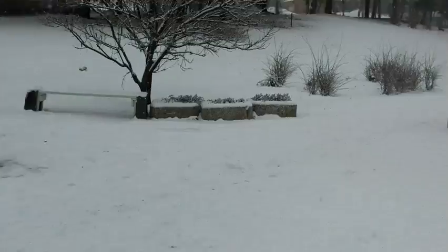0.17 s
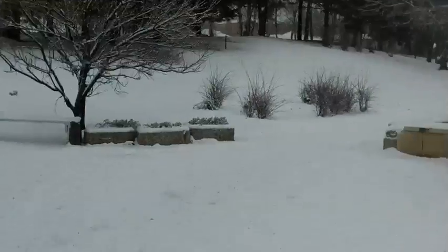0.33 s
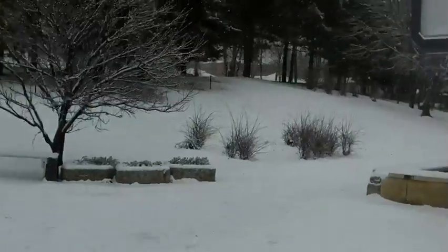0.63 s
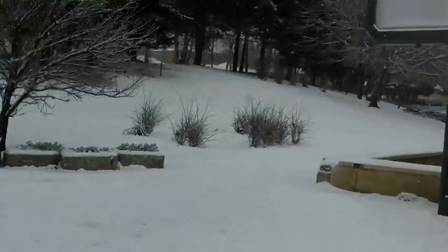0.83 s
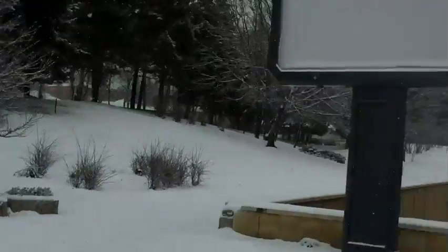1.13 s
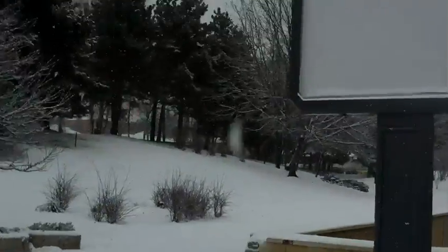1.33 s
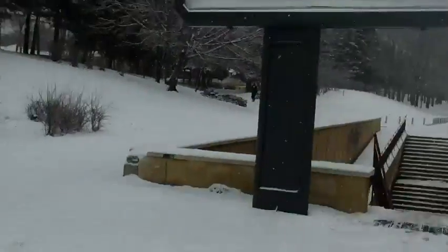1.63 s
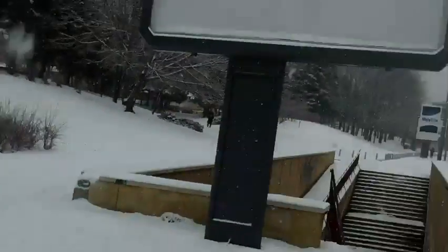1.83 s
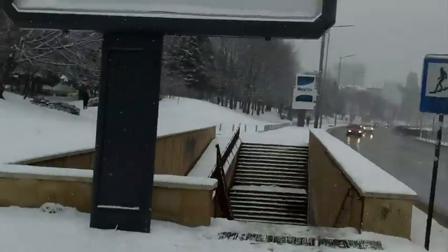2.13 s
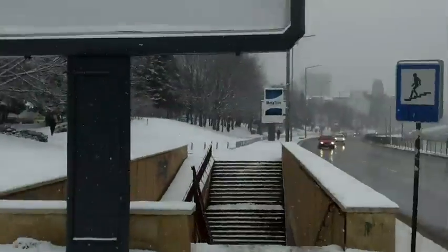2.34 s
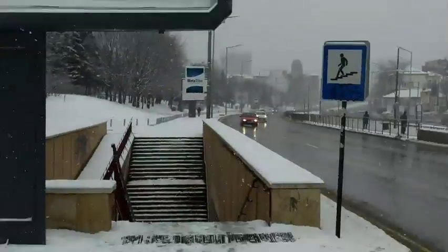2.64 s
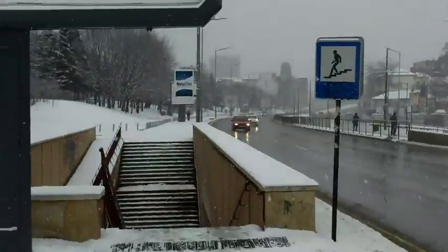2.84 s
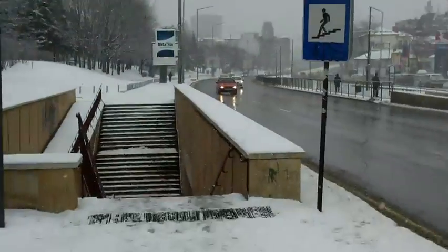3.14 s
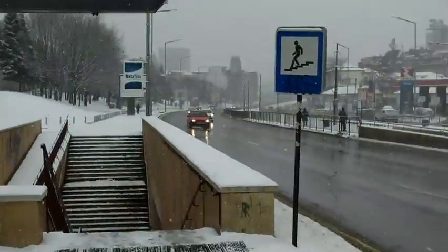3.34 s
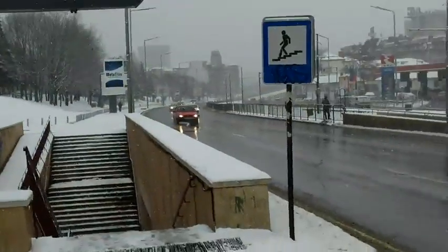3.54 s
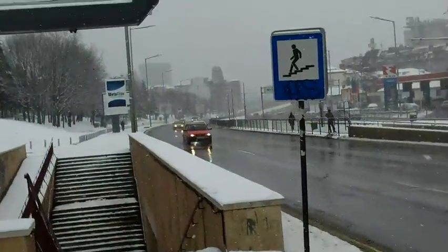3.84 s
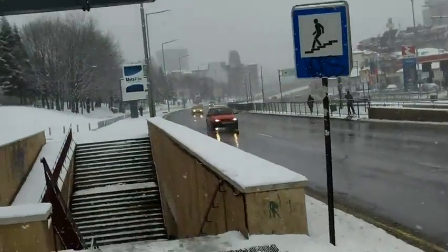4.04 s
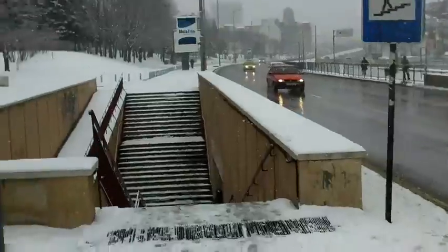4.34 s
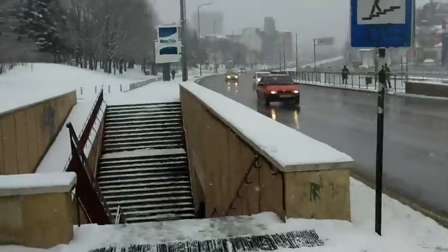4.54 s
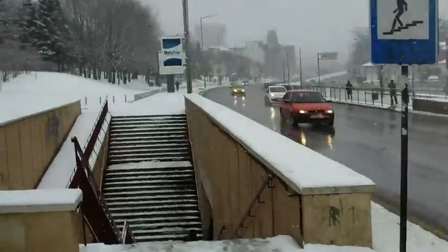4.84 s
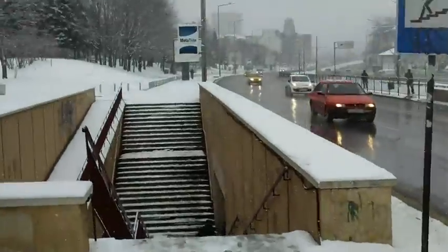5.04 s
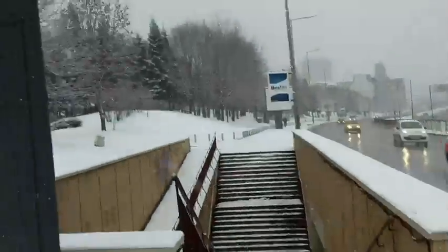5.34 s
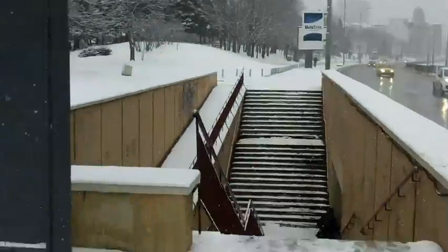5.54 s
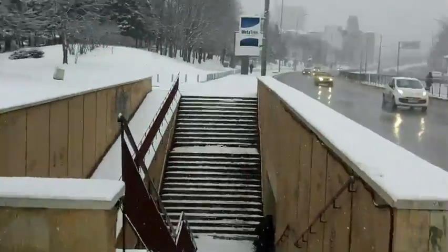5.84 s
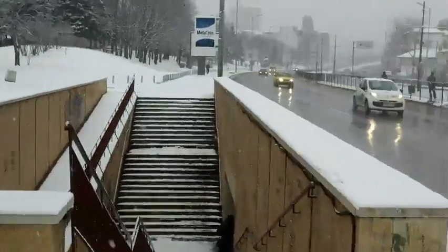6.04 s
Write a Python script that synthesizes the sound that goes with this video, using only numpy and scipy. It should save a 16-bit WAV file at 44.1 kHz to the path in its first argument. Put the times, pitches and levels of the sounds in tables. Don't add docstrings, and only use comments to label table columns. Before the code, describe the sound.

Cars hiss past on a wet, slushy road, tyre spray swelling twice over a low drone of engines and distant traffic.

```python
import sys
import numpy as np
from scipy import signal
from scipy.fft import rfft, irfft
from scipy.io import wavfile
from scipy.ndimage import uniform_filter1d

SR = 44100
rng = np.random.default_rng(int(sys.argv[2]) if len(sys.argv) > 2 else 0)


def inscribe(sig):
    pcm = np.round(np.clip(np.atleast_2d(sig).T, -1, 1) * 32767)
    wavfile.write(sys.argv[1], SR, pcm.astype(np.int16))


def elevation(decibels):
    levels = np.asarray(decibels, float)
    return 10 ** (levels / 20)


N = 272777
HZ = np.fft.rfftfreq(512, 1 / SR)[:, None]
TIME = np.arange(N // 128 + 5) * 128 / SR


def evened(x):
    return x / np.sqrt(np.mean(x ** 2) + 1e-20)


def hump(x, centre, spread):
    return np.exp(-.5 * ((x - centre) / spread) ** 2)


def read(points, hz):
    f, value = np.transpose(points)
    return np.interp(np.log(hz + 1), np.log(f + 1), value)


def power_db(power):
    return 10 * np.log10(power)


def blotches(bins, frames):
    field = rng.standard_normal((len(TIME), len(HZ))).T
    for _ in range(2):
        field = uniform_filter1d(field, bins, axis=0)
        field = uniform_filter1d(field, frames, axis=1, mode="wrap")
    return evened(field)


def noise(power):
    a, b = rng.standard_normal((len(TIME), len(HZ), 2)).T
    spectra = a + 1j * b
    flat = signal.istft(spectra, nperseg=512, noverlap=384)[1]
    unit = flat.std() / np.sqrt(len(HZ))
    return signal.istft(spectra * np.sqrt(power) / unit, nperseg=512, noverlap=384)[1][:N]


# [f/Hz, level/dB per bin]
SELF_HISS = [(6000, -108), (9000, -100), (12000, -99), (15000, -99)]


def self_hiss():
    return elevation(read(SELF_HISS, HZ)) ** 2


# [t/s, low f/Hz, high f/Hz]
PARTINGS = [
    (1.23, 6800, 8400),
    (3.46, 4100, 6400),
    (4.06, 4600, 6400),
    (4.62, 4100, 6400),
    (4.83, 4100, 5300),
    (5.5, 13000, 14500),
    (5.97, 7500, 9000),
    (6.15, 4600, 5700),
    (6.15, 8800, 10400),
]


def parting(road, both):
    faint = (power_db(both) + 2.6 * blotches(3, 6) < -90.5) * (HZ > 7000) * (HZ < 15100)
    faint = faint * (blotches(2, 12) < .3)
    side_db = -2.5
    side = elevation(side_db) ** 2 * np.minimum(both, elevation(-77) ** 2) * faint
    for at, lo, hi in PARTINGS:
        side = side + elevation(-2.0) ** 2 * road * (abs(TIME - at) < .007) * (HZ > lo) * (HZ < hi)
    return side


def thinned(both):
    weak = (power_db(both) < -90) * (HZ > 12600)
    holes = weak * (blotches(1, 14) > .2)
    holes = np.maximum(holes, (HZ > 15100) * (blotches(1, 12)[0] > -.2))
    return both * (1 - holes) * elevation(1.5 * weak) ** 2


# [t/s, nearness level/dB, lane wetness level/dB, heading +1 coming to -1 leaving]
TRAFFIC = [(0, 1, -2.5, 0.17), (.43, 1, -8.5, 0.9), (.62, -1, -5, 1), (.9, 2, 7, 0.72), (1.1, 6.5, 5, 0.32),
           (1.35, 7.5, 3.5, 0.046), (1.55, 8.5, 0, -0.24), (1.75, 5.5, -10.5, -0.96),
           (2.1, 1.15, -10, -0.77), (3.2, -5.5, -11.5, 0.35), (4.29, -10.5, 3.5, 0.34),
           (4.39, -9.5, 10, 0.32), (4.7, -8.5, 1, 0.5), (5.13, -7.5, 9, 0.42), (5.45, -4.5, 10, 0.62),
           (5.75, 1, 4, 0.12), (6.0, 6, 3, -0.27), (6.19, 8, 1, -0.92)]


def traffic(t):
    s, *columns = np.transpose(TRAFFIC)
    return [np.interp(t, s, c) for c in columns]


# [f/Hz, level/dB per Hz]
DRONE_COLOUR = [(15, -72), (25, -40), (43, -16.5), (75, -14), (114, -13), (141, -7.5), (204, -6), (253, -4),
                (430, -10), (600, 1), (780, 3.5), (1320, -120)]
# [t/s, level change/dB, length/s]
REVS = [
    (1.598, 4, 0.22),
    (2.35, -1.5, 0.51),
    (3.3, 2, 0.089),
    (4.4, -0.5, 0.23),
    (5.85, -7, .06),
]


def drone():
    t, hz = np.arange(N) / SR, np.fft.rfftfreq(N, 1 / SR)
    colour = elevation(read(DRONE_COLOUR, hz))
    wash = irfft(rfft(rng.standard_normal(N)) * colour, N)
    share = np.sum(colour[(hz > 100) & (hz < 420)] ** 2) / np.sum(colour ** 2)
    swell_db = sum(db * hump(t, at, length) for at, db, length in REVS)
    town_db, engine_db, engine_share = -64.5, -62, 0.57
    level = np.hypot(elevation(town_db), elevation(engine_db + engine_share * traffic(t)[0]))
    return elevation(swell_db) * evened(wash) / np.sqrt(share) * level


# [f/Hz, width/Hz, level/dB, loudest
# t/s, length/s]
TONES = [(75, 2, -70, .5, 1.8), (228, 4, -63, 1.5, .2), (76, 5, -72, 5.5, 1.1), (90, 1.5, -72, 4, 1.2),
         (181, 2, -73, 3.6, .8), (147, 5, -68, 4.95, .17), (149, 5, -67, 5.2, .06), (146, 5, -68, 5.5, .13),
         (148, 5, -68, 5.8, .1), (268, 6, -73, 4.5, .4), (112, 2, -77, 2.4, .4), (100, 3, -75, .5, .5),
         (150, 3, -69, .3, .25), (58, 4, -72, 1.45, .2), (175, 5, -68, 5.85, .2), (125, 4, -75, 4.2, .4),
         (7867, 6, -78, 3, 4), (7820, 6, -81, 2.4, 1), (7915, 6, -81, 3.2, 1.2), (6420, 150, -69, 1, .7)]


def tones(steady=4):
    t, out = np.arange(N) / SR, 0
    for hz, width, db, at, length in TONES:
        r = np.exp(-np.pi * width / SR)
        a, b = signal.lfilter([1 - r], [1, -r], rng.standard_normal((2, N)))
        waver = steady + evened(a) + 1j * evened(b)
        line = evened((waver * np.exp(2j * np.pi * hz * t)).real)
        out = out + line * elevation(db) * hump(t, at, length)
    return out


# [t/s, peak level/dB, pitch f/Hz, length/cycles, polarity]
KNOCKS = [(0.0486, -18, 525, 0.5, 0.55), (0.4929, -20.5, 540, 0.56, 0.86), (0.509, -22, 467, 0.51, -0.82),
          (0.5142, -33, 447, 0.72, 0.75), (0.5206, -19.5, 450, 0.53, 0.75), (.55, -22.5, 348, 0.52, 0.93),
          (0.6314, -19.5, 400, 0.45, 0.83), (0.6423, -30, 380, 0.47, -1.1), (4.089, -45, 400, 0.54, 1),
          (5.7298, -40, 332, 0.6, -1), (5.7352, -24, 2000, .6, -1), (5.773, -25, 1800, .6, -1)]


def knocks():
    t, out = np.arange(N) / SR, 0
    sag = 0.11
    for at, db, hz, cycles, polarity in KNOCKS:
        turns = (t - at) * hz
        swing = np.cos(2 * np.pi * turns * (1 - sag * np.tanh(turns)))
        out = out + polarity * elevation(db) * hump(turns, 0, cycles) * swing
    return out


# [f/Hz, level/dB per Hz]
WET_ROAD = [(180, -67), (300, -12), (431, -12.5), (767, -1), (1280, -0.5), (1870, -5), (2770, -6),
            (5620, -13), (6630, -16), (8620, -21), (11600, -31), (14400, -36), (15300, -39)]


def road_colour(octave, heading, horn_db=3, groove_db=0.0):
    ridge_octaves, doppler = .22, 0.028
    horn_hz, groove_hz = np.outer([847, 1670], 1 + doppler * heading)
    ridges_db = horn_db * hump(octave, np.log2(horn_hz), ridge_octaves)
    ridges_db = ridges_db + groove_db * hump(octave, np.log2(groove_hz), ridge_octaves)
    return elevation(read(WET_ROAD, HZ) + ridges_db) ** 2


# [t/s, level change/dB, centre f/Hz,
# spread/octaves, length/s]
LIFTS_AND_DIPS = [(.685, 3.5, 10000, 1, .025), (.52, 2, 9000, .5, .05), (1.07, -2.5, 11000, .7, .015),
                  (0.88, 2, 5000, 1.8, 0.013), (1.25, 2, 9000, 1, .04), (1.862, 7, 950, 0.4, 0.009),
                  (1.937, 3, 1200, 0.43, 0.011), (4.087, 2, 8500, .8, .03), (4.36, 1.5, 8000, 1, 0.02),
                  (5.13, 2, 9000, 1, .02), (4.55, 3, 12500, .4, .04), (4.9, 3, 6600, 1.7, .02),
                  (5.65, 3, 12500, .3, .12), (5.735, 4, 2500, .9, 0.005), (5.733, 5.5, 2500, 1, .012),
                  (5.735, 4, 11500, .35, .02), (5.79, 2, 10000, .5, .04), (.7, 2.5, 3500, .6, .035),
                  (.58, -2, 3200, .6, .06), (1.465, 2.5, 11000, .5, .015), (1.47, 3, 400, .5, .03),
                  (1.105, 2, 7000, .8, .012), (1.64, -2, 700, .2, .04), (5.14, 2, 11500, .4, .025),
                  (5.82, -2, 400, .4, .025), (4.088, 5, 1200, 1.2, .006), (4.035, 3.5, 2000, .7, .012),
                  (4.435, 3, 2500, .9, .01), (4.1, 2, 2500, .6, .04), (.66, 2, 800, .4, .05),
                  (.54, 2, 10500, .5, .03), (1.24, 2, 9500, .2, .05), (1.62, 2, 9500, .3, .02),
                  (4.74, 2, 9500, .2, .05), (5.0, -3, 900, .3, .04), (5.52, 2, 12000, .4, .02),
                  (5.745, 2, 3000, .8, .006), (1.3, 3, 800, .25, .04), (1.43, 2.5, 950, .2, .03),
                  (5.765, 2.5, 2000, .7, .012),
                  (0.38, 3, 1640, 0.16, 0.99), (0.65, 3.5, 7200, 0.16, 0.14), (0.87, 8, 460, 0.65, 0.44),
          (0.91, 3.5, 1970, 0.26, 0.1), (1.24, 4.5, 6600, 0.22, 0.27), (1.41, 3, 1100, 0.23, 0.1),
          (1.54, 6.5, 920, 0.071, 0.072), (1.37, 5.5, 784, 0.081, 0.063), (1.56, -3.5, 1550, 0.39, 0.28),
          (5.88, 3, 740, 0.12, 0.065), (5.86, 1, 1500, 0.31, 0.048), (5.07, 0.5, 920, 0.27, 0.087),
          (6.0, -3, 970, .15, 0.082), (3.14, -4, 1650, 0.42, 0.14), (0.82, -0.5, 960, 0.2, .1),
          (0.98, 3, 1600, 0.054, 0.064), (1.13, 5, 1050, 0.086, .07), (1.306, 6.5, 1520, 0.073, 0.044),
          (1.605, -7, 600, 0.18, 0.042), (1.8, 3, 1150, 0.14, 0.046), (5.42, -2, 3500, 0.93, 0.1),
          (2.62, -2.5, 1200, 0.16, 0.13), (3.36, 4, 840, 0.26, 0.12), (3.78, 3.5, 1600, 0.15, 0.08),
          (4.72, 3.5, 5300, 0.4, 0.32), (4.94, -4, 15000, .25, 0.1), (5.53, 6.5, 804, 0.084, 0.33),
          (6.13, 5.5, 7000, 0.3, 0.34), (5.95, 5, 710, 0.16, 0.22), (6.2, 5, 4600, 0.13, 0.58),
          (6, 3, 1730, 0.29, 0.4), (.1, -5, 12000, .4, 0.12), (0.65, 4, 12000, .2, .15),
          (3.2, 3, 12500, .2, 0.18), (4.0, 2, 9100, .2, .2), (4.3, -4, 14000, .2, 0.14),
          (5.44, -2.5, 13000, .2, .2), (1.28, -3.5, 12500, .2, 0.16), (5.67, -1, 1700, .25, 0.066),
          (3.74, -2, 1800, 0.19, 0.087)]


def local_lift_db(octave):
    lift_db = 0
    for at, db, hz, octaves, length in LIFTS_AND_DIPS:
        lift_db = lift_db + db * hump(octave, np.log2(hz), octaves) * hump(TIME, at, length)
    return lift_db


# [low f/Hz, high f/Hz]
BANDS = [
    (550, 1200),
    (1300, 3200),
    (4000, 8000),
    (9000, 13000),
]
# [level/dB, share of nearness, share of wetness, thrown forward level/dB]
LAYERS = [
    (-42.5, 0.7, 0.0053, -1.5),
    (-38, 0.71, 0.18, 4.5),
    (-50.5, 0.81, 0.29, 2.5),
    (-63.5, 1, 0.87, 1),
]


def tyres(gust_db=-0.1, flick_db=.8, patch_db=.6):
    near_db, wet_db, heading = traffic(TIME)
    octave = np.log2(HZ + 1)
    centres = np.log2(np.sqrt(np.prod(BANDS, axis=1)))
    colour = road_colour(octave, heading)
    field_db = 0
    for own, (lo, hi), (db, near, wet, front_db) in zip(np.eye(len(BANDS)), BANDS, LAYERS):
        level_db = db + near * near_db + wet * wet_db + front_db * heading
        in_band = colour[(HZ[:, 0] > lo) & (HZ[:, 0] < hi)].sum(axis=0)
        share = np.interp(octave, centres, own)
        field_db = field_db + share * (level_db - power_db(in_band))
    treble = np.clip((octave - np.log2(900)) / 3.7, 0, 1)
    gusts = np.tanh(evened(blotches(1, 24)[0]))
    flicks = evened(blotches(1, 4)[0])
    field_db = field_db + patch_db * blotches(8, 24) + treble * (gust_db * gusts + flick_db * flicks)
    return colour * elevation(field_db + local_lift_db(octave)) ** 2


def scene():
    road = tyres()
    both = road + self_hiss()
    side = noise(parting(road, both))
    middle = noise(thinned(both)) + drone() + tones() + knocks()
    return middle + np.outer([1, -1], side)


def low_pass(x):
    return signal.sosfilt(signal.butter(12, 15490, fs=SR, output="sos"), x)


def record(dry):
    band = signal.firwin(1023, 15260, window=("kaiser", 9), fs=SR)
    mix = signal.oaconvolve(dry, band[None], "same")
    return low_pass(mix)


dry = scene()
out = record(dry)
inscribe(out)
```